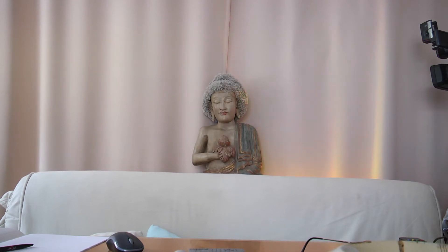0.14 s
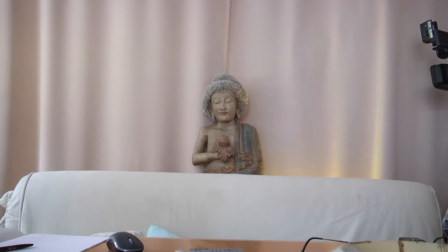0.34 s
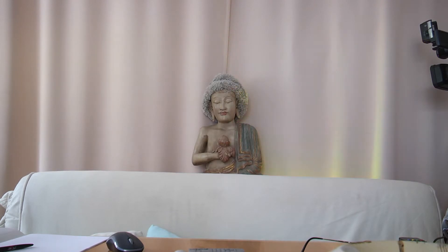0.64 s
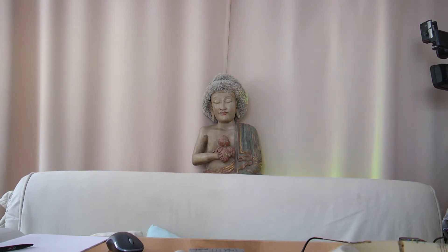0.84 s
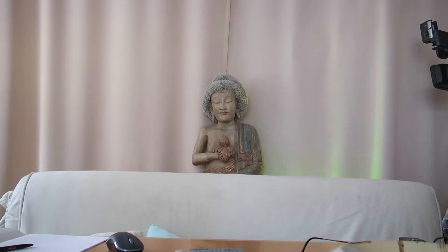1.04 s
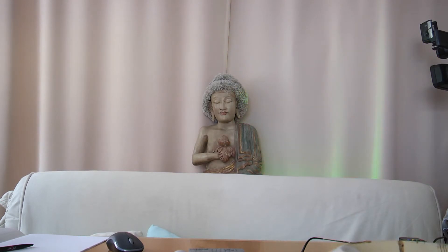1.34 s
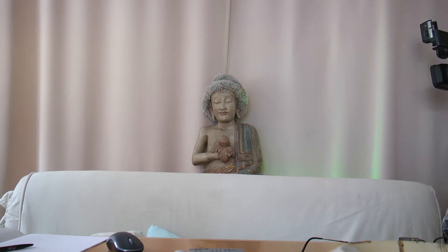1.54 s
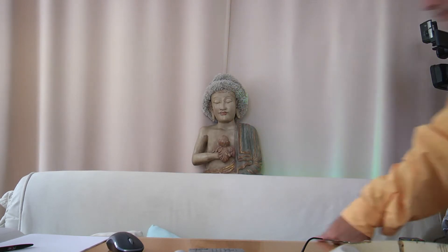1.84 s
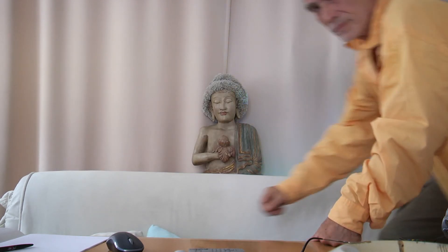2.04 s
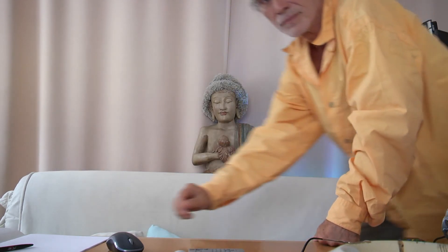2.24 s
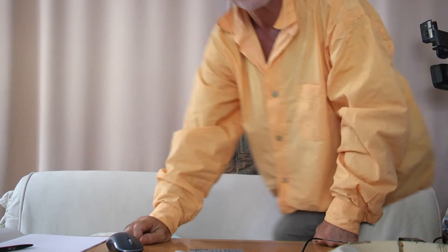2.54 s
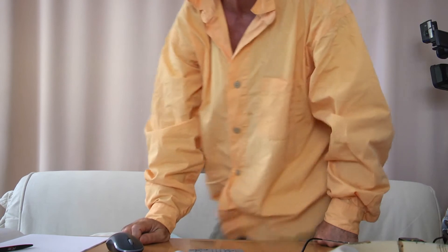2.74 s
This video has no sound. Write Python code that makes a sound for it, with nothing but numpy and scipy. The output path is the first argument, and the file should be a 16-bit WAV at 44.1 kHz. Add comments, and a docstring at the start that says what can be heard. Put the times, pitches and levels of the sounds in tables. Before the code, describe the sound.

A wooden desk thuds and rocks as someone leans on it, heard close through a microphone standing on it. Soft fabric rustle and dull footsteps come first, then two bumps with sharp ticks and light rattles, in a quiet room.

```python
"""Sitting down at a wooden desk

In a quiet room a person steps up to a desk, bumps it and leans on it with both hands to sit down.
The floor booms under heel and sole. The desk carries the microphone: it thuds, rings, sways and
knocks at the end of each swing. Clothes rustle, shoe and hand slide, a joint squeaks, wood scrapes,
loose things rattle, and something hard ticks on the desktop."""
import sys
import numpy as np
from scipy import signal
from scipy.fft import rfft, irfft
from scipy.io import wavfile

SR = 44100
rng = np.random.default_rng(int(sys.argv[2]) if len(sys.argv) > 2 else 0)


def wav_record(signal):
    """Record a signal, one row per channel, as 16-bit PCM in the file named by sys.argv[1]."""
    frames = np.transpose(np.atleast_2d(signal))
    bounded = np.clip(frames, -1, 1)
    # unit amplitude maps onto the largest positive 16-bit level
    quanta = np.round(bounded * 32767).astype(np.int16)
    wavfile.write(sys.argv[1], SR, quanta)


N = 127890
TIME = np.arange(N) / SR


def amp(db):
    """Decibels to gain."""
    return 10 ** (np.asarray(db) / 20)


def unit(x):
    """Scales to rms 1."""
    return x / np.sqrt(np.mean(x ** 2) + 1e-20)


def colour(x, curve):
    """EQ along a curve of (f/Hz, level/dB) points, keeping the power of white noise."""
    hz, db = np.transpose(curve)
    gain = amp(np.interp(np.log(np.fft.rfftfreq(N, 1 / SR) + 1), np.log(hz), db))
    return irfft(rfft(x) * unit(gain), N)


def noise(curve):
    """Steady coloured noise."""
    return unit(colour(rng.standard_normal(N), curve))


def wander(step_s):
    """A random modulator that glides to a new value every step."""
    return np.interp(TIME / step_s, np.arange(N), rng.standard_normal(N))


def friction(curve, grain_db=1.5, grain_s=0.0044):
    """Noise that comes in small clumps as fibres catch and slip."""
    return unit(noise(curve) * amp(grain_db * wander(grain_s)))


def swells(moves):
    """An envelope that swells and fades in a lopsided bell for each movement."""
    return sum(amp(db) * np.exp(-.5 * ((TIME - peak) / np.where(TIME < peak, rise, fall)) ** 2)
               for peak, rise, fall, db in moves)


def push(at, contact):
    """A soft, bell-shaped force of area 1; longer contact sounds duller."""
    return np.exp(-.5 * ((TIME - at) / contact) ** 2) / (contact * SR * np.sqrt(2 * np.pi))


def ring(force, modes):
    """A force sets the modes of a body ringing."""
    t = TIME[:SR]
    body = sum(amp(db - 60 * t / t60) * np.sin(2 * np.pi * hz * t) for hz, db, t60 in modes)
    return signal.fftconvolve(force, body)[:N]


# EQ of the still air: f/Hz, level/dB
AIR_EQ = [(15, 7), (30, -10.5), (55, 2), (95, -8), (200, -8), (330, -13.5), (460, -15.5), (700, -17),
          (950, -21.5), (2000, -25), (4000, -26), (6000, -31.5), (9000, -36.5), (15500, -42)]
# hum tones: f/Hz, level/dB
HUM_TONES = [(97, -61.5), (457.6, -71)]
def room_tone(air_db=-57):
    """A bed of dark air with a steady hum."""
    hum = sum(amp(db) * np.sin(2 * np.pi * hz * TIME) for hz, db in HUM_TONES)
    return amp(air_db) * noise(AIR_EQ) + hum


# fader moves of the rustle: t/s, body level/dB, fizz level/dB
RUSTLE_FADERS = [(0, -59.5, -67), (.3, -66, -91), (1.17, -60, -83), (1.215, -50, -69), (1.469, -49.5, -66),
                 (1.578, -53.5, -75), (1.8, -54, -65.5), (2.07, -52.5, -62), (2.2, -52.5, -64),
                 (2.45, -51, -63), (2.7, -49.5, -63), (2.9, -48.5, -62)]
# EQ of the fabric's body: f/Hz, level/dB
CLOTH_EQ = [(25, 16), (60, -28.5), (110, 0), (190, 6), (380, -3), (650, 4), (950, -3.5), (2000, -7.5),
            (3800, -7.5), (5200, -18.5), (7500, -28), (10000, -57), (16000, -57)]
# EQ of the fabric's top-end fizz: f/Hz, level/dB
FIZZ_EQ = [(1000, -8), (5000, 9.5), (7500, 6), (10000, 0.5), (14000, 1), (16000, -5)]
# crossovers between the bands of the rustle: f/Hz
FOLD_CROSSOVERS = [500, 1000, 1700, 2800, 4500]
def clothes(fold_db=1.4, fold_s=.035):
    """Fabric rustles, brighter as the person comes near; its folds swell each band on its own."""
    spectrum = rfft(friction(CLOTH_EQ))
    band = np.digitize(np.fft.rfftfreq(N, 1 / SR), FOLD_CROSSOVERS)
    folds = sum(irfft(spectrum * (band == k), N) * amp(fold_db * wander(fold_s))
                for k in np.unique(band))
    times, body_db, fizz_db = np.transpose(RUSTLE_FADERS)
    body = unit(folds) * amp(np.interp(TIME, times, body_db))
    fizz = friction(FIZZ_EQ) * amp(np.interp(TIME, times, fizz_db))
    return body + fizz


# sleeve moves: peak t/s, rise/s, fall/s, level/dB
SLEEVE_MOVES = [(.005, .02, 0.03, -61), (.18, 0.049, 0.072, -63.5), (.705, 0.038, 0.042, -56),
                (.99, 0.02, 0.022, -72), (1.65, 0.034, 0.023, -55.5), (1.885, 0.019, 0.026, -56.5),
                (2.49, 0.021, 0.012, -52)]
# EQ of a sleeve: f/Hz, level/dB
SLEEVE_EQ = [(300, -21), (1500, 8), (4000, 9.5), (7000, 0), (10000, -10), (16000, -13)]
def sleeves():
    """Bright friction swishes as the sleeves move."""
    return friction(SLEEVE_EQ) * swells(SLEEVE_MOVES)


# rubs against the furniture: peak t/s, rise/s, fall/s, level/dB
RUB_MOVES = [(.05, 0.091, 0.19, -60), (1.16, 0.033, 0.05, -50.5), (1.665, 0.047, 0.019, -48),
             (1.74, 0.043, 0.023, -42), (1.93, 0.062, 0.039, -34), (2.12, 0.11, 0.17, -48.5),
             (2.415, 0.021, 0.034, -34), (2.52, .04, 0.12, -37.5), (2.87, 0.117, 0.076, -46)]
# EQ of a rub: f/Hz, level/dB
RUB_EQ = [(30, -18), (100, -1.5), (190, 0), (280, -12.5), (450, -16), (800, -23.5), (3000, -59)]
def rubs():
    """Dull, bass-heavy friction against the furniture."""
    return friction(RUB_EQ) * swells(RUB_MOVES)


# shoe and hand moves: peak t/s, rise/s, fall/s, level/dB
SLIDE_MOVES = [(.18, 0.068, 0.052, -63), (.70, 0.05, 0.063, -48.5), (1.25, 0.023, 0.04, -59),
               (1.935, 0.015, 0.041, -44), (2.49, 0.01, 0.031, -46), (2.78, 0.028, 0.054, -48)]
# EQ of a slide: f/Hz, level/dB
SLIDE_EQ = [(60, -14), (300, 14), (650, 11), (1000, 2), (1800, 1.5), (3300, -4.5), (6000, -26), (9000, -53),
            (16000, -53)]
def slides():
    """Shoe and hand slide with a soft midrange friction."""
    return friction(SLIDE_EQ) * swells(SLIDE_MOVES)


# jolts: t/s, f/Hz, level/dB
RATTLE_HITS = [(0.184, 1180, -51), (0.759, 715, -43), (1.198, 747, -43), (1.474, 684, -48),
               (1.827, 576, -32), (2.093, 200, -32.5), (2.104, 1190, -45.5), (2.306, 267, -39),
               (2.402, 656.5, -30), (2.66, 940, -40), (2.765, 655, -33.5)]
def rattles(attack_s=0.00088, t60=0.049, roughness=0.086):
    """Loose things and panels give one short, rough note when jolted."""
    out = np.zeros(N)
    for at, hz, db in RATTLE_HITS:
        t = np.maximum(TIME - at, 0)
        pitch = hz * (1 + roughness * wander(0.0014))
        phase = 2 * np.pi * np.cumsum(pitch) / SR
        out += np.minimum(t / attack_s, 1) * amp(db - 60 * t / t60) * np.sin(phase)
    return out


# furniture squeaks: t/s, length/s, top f/Hz, level/dB, bend/share of pitch
SQUEAK_CUES = [(0.488, 0.016, 2580, -64, .02), (0.533, 0.02, 2590, -47.5, .02),
               (0.552, 0.027, 2550, -52.5, .015), (1.5, 0.046, 2550, -55.5, .15)]
def squeaks(overtone_ratio=1.49, overtone_db=-11.5, roughness=0.0202):
    """A joint sticks and slips with a thin tone that peaks early, then sinks and fades."""
    out = np.zeros(N)
    for at, length, hz, db, bend in SQUEAK_CUES:
        progress = np.clip((TIME - at) / length, 0, 1)
        arch = np.sin(np.pi * progress ** .6)
        pitch = hz * (1 - bend * (1 - arch) + roughness * wander(0.0015))
        phase = 2 * np.pi * np.cumsum(pitch) / SR
        out += amp(db) * arch * (np.sin(phase) + amp(overtone_db) * np.sin(overtone_ratio * phase))
    return out


# hard hits on wood: t/s, click level/dB, click f/Hz, wood level/dB
TAP_HITS = [(0.638, -73, 1500, -44.5), (1.199, -50, 2300, -59), (1.8275, -46, 4000, -42.5),
            (1.8986, -44, 1100, -40), (1.929, -47, 1400, -44), (2.308, -38, 2250, -36.5),
            (2.3957, -36.5, 4670, -34), (2.397, -29.5, 2950, -39.5), (2.4185, -29, 3360, -46),
            (2.421, -41, 4330, -58), (2.4565, -39.5, 1200, -44), (2.513, -36, 1400, -43.5),
            (2.5553, -40, 1190, -58), (2.5994, -48, 1080, -43), (2.662, -39.5, 1290, -45),
            (2.7562, -33.5, 3400, -45), (2.769, -45, 3400, -48), (2.824, -59, 3000, -43.5),
            (2.868, -68, 2500, -43)]
# EQ of the click: f/multiple of click f, level/dB
CLICK_EQ = [(.08, -35), (.4, -20), (.75, 13), (1.1, 13), (1.9, 5), (2.8, -18), (4.5, -19)]
# EQ of the wooden knock: f/Hz, level/dB
WOOD_EQ = [(100, -19), (300, 4), (650, 4), (1000, -11.5), (1800, -11.5), (3500, -56), (12000, -52)]
def taps(click_t60=0.0091, wood_t60=0.076):
    """A click whose brightness depends on what strikes, then the short knock of wood."""
    clicks, wood_envelope = np.zeros(N), np.zeros(N)
    for at, click_db, click_hz, wood_db in TAP_HITS:
        t = np.maximum(TIME - at, 0)
        crack = noise([(ratio * click_hz, db) for ratio, db in CLICK_EQ])
        clicks += crack * np.minimum(t / 0.00023, 1) * amp(click_db - 60 * t / click_t60)
        wood_envelope += np.minimum(t / 0.00013, 1) * amp(wood_db - 60 * t / wood_t60)
    return clicks + wood_envelope * noise(WOOD_EQ)


# heel and sole hits as the weight shifts: t/s, level/dB, contact/s
STEP_HITS = [(0.642, -24.5, 0.0016), (0.652, -14, 0.0027), (.668, -14, 0.0017), (0.683, -17, 0.0019),
             (.707, -17.5, 0.0016), (0.733, -34, 0.0015), (0.768, -24.5, 0.0022), (0.789, -19.5, 0.0068),
             (0.85, -25.5, 0.0036), (.905, -29, 0.0033), (.97, -44.5, 0.0023)]
# floor resonances: f/Hz, level/dB, t60/s
FLOOR_MODES = [(34.1, -2, 0.24), (65, -6, 0.073), (85.3, 3, 0.21), (108, -2.5, 0.24), (152, 0.5, 0.19),
               (176.5, -0.5, 0.35), (294, -20, 0.15)]
def footsteps(low_cut_hz=32.3):
    """Heel and sole press the floor down and make it boom; the slowest push is not heard."""
    force = -sum(amp(db) * push(at, contact) for at, db, contact in STEP_HITS)
    low_cut = signal.butter(2, low_cut_hz, "high", fs=SR, output="sos")
    return signal.sosfilt(low_cut, ring(force, FLOOR_MODES))


# bouts of rocking: t/s, level/dB, f/Hz, rise/s, hold/s, t60/s, knock level re swing/dB
SWAY_CUES = [(1.005, -46.5, 29.4, 0.032, 0.13, .3, -28), (1.147, -32.5, 31, 0.084, 0.059, 0.68, -4),
             (1.866, -17, 30.74, 0.029, 0.094, 0.5, 1), (2.121, -40, 30, 0.012, 0.029, 1, -16),
             (2.391, -32, 34.4, 0.03, 0.029, 0.2, -10), (2.4678, -12.5, 32.38, 0.0092, 0.087, 0.51, 6),
             (2.786, -40.5, 37.4, 0.014, .06, 0.65, 1)]
# desktop resonances, rung by knocks and bumps: f/Hz, level/dB, t60/s
DESK_MODES = [(89.6, -13, 0.21), (147, -23, 0.064), (180.7, -2, 0.177), (218.6, -18.5, 0.41),
              (278, -7, 0.13), (362, -6, 0.1), (575, -25, .12)]
def sway(sharpness=4.46, scatter=.45, ring_db=-15, knock_low_cut_hz=45):
    """The desk rocks on its legs and knocks once per swing, more softly as it settles."""
    swing, knocks = np.zeros(N), np.zeros(N)
    for at, db, hz, rise, hold, t60, knock_db in SWAY_CUES:
        t = np.maximum(TIME - at, 0)
        envelope = np.minimum(t / rise, 1) * amp(-60 * np.maximum(t - hold, 0) / t60)
        tilt = np.cos(2 * np.pi * hz * t)
        swing += amp(db) * envelope * tilt
        pulses = np.exp(sharpness * (tilt - 1))
        unevenness = 1 + scatter * wander(.008)
        knocks += amp(db + knock_db) * envelope ** 1.12 * pulses * unevenness
    low_cut = signal.butter(2, knock_low_cut_hz, "high", fs=SR, output="sos")
    knocks = signal.sosfiltfilt(low_cut, knocks)
    return swing + knocks + amp(ring_db) * ring(np.gradient(knocks), DESK_MODES)


# light brushes of fabric: peak t/s, rise/s, fall/s, level/dB
BRUSH_MOVES = [(1.237, 0.01, 0.013, -63.5), (1.86, 0.021, 0.042, -58.5), (2.83, 0.056, 0.072, -71)]
def brushes():
    """Fabric brushes by in brief wisps of top-end friction."""
    return friction(FIZZ_EQ) * swells(BRUSH_MOVES)


# soft blows on the desk: t/s, level/dB, contact/s
BUMP_HITS = [(1.8308, -10, 0.0011), (1.8644, -6, .0015), (2.096, -30, 0.0016), (2.405, -20.5, 0.0011),
             (2.4219, -25, 0.0012), (2.482, -14.5, 0.0014), (2.51, -11.5, 0.0038), (2.541, -22.5, 0.0031),
             (2.559, -17, 0.0021), (2.692, -21.5, 0.0043), (2.821, -34, 0.0037)]
def bumps(thud_db=3.5):
    """Each blow shoves the desktop down and back and leaves it ringing."""
    out = np.zeros(N)
    for at, db, contact in BUMP_HITS:
        progress = (TIME - at) / contact - 1
        thud = amp(thud_db) * progress * np.exp(-.5 * progress ** 2)
        out += amp(db) * (thud + ring(push(at, contact), DESK_MODES))
    return out


# the shove of the desk: peak t/s, rise/s, fall/s, level/dB
SCRAPE_MOVES = [(1.9, 0.013, 0.03, -42)]
# EQ of the grit: f/Hz, level/dB
SCRAPE_EQ = [(100, -5), (650, 1), (1200, -1.5), (2000, -12.5), (4000, -16), (9000, -39)]
def scrape(slips_per_s=900, spread_db=4):
    """Wood drags in many tiny slips of uneven size."""
    slips = (rng.random(N) < slips_per_s / SR) * rng.choice([-1, 1], N)
    sizes = amp(spread_db * np.minimum(rng.exponential(1, N), 2))
    return unit(colour(slips * sizes, SCRAPE_EQ)) * swells(SCRAPE_MOVES)


def reflections(x, t60=0.22, predelay_s=.004):
    """A short reverb tail from a curtained room."""
    t = TIME[:SR // 2]
    tail = rng.standard_normal(len(t)) * amp(-60 * t / t60) * (t > predelay_s)
    return signal.fftconvolve(x, tail / np.linalg.norm(tail))[:N]


def room(x, mid_db=-12.5, side_db=-39.5):
    """Direct sound and reflections, nearly the same in both channels."""
    mid = x + amp(mid_db) * reflections(x)
    side = amp(side_db) * reflections(x)
    return np.array([mid + side, mid - side])


def scene():
    """Thumps arrive through the furniture, slightly left; small sounds through the air."""
    solid = rubs() + footsteps() + sway() + bumps()
    fabric = clothes() + sleeves() + brushes()
    airborne = fabric + slides() + rattles() + squeaks() + taps() + scrape()
    balance_db = 0.94
    pan = amp([[balance_db / 2], [-balance_db / 2]])
    return room_tone() + pan * solid + room(airborne)


def record(dry):
    """Faint microphone hiss, a cut of the deepest bass and the band limit."""
    hiss_db, low_cut_hz, high_cut_hz = -89, 8, 15800
    hissy = dry + amp(hiss_db) * rng.standard_normal((2, N))
    low_cut = signal.butter(1, low_cut_hz, "high", fs=SR, output="sos")
    high_cut = signal.firwin(511, high_cut_hz, window=("kaiser", 9), fs=SR)
    return signal.oaconvolve(signal.sosfilt(low_cut, hissy), high_cut[None], "same")


dry = scene()
out = record(dry)
wav_record(out)
```